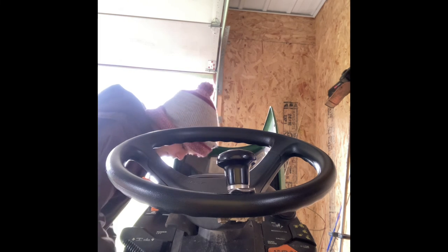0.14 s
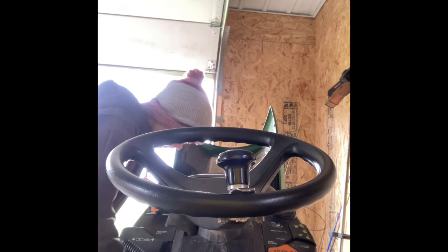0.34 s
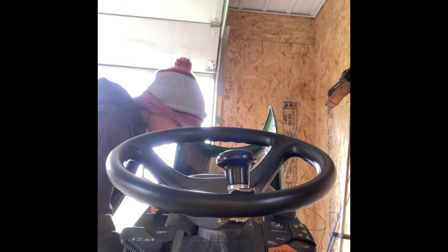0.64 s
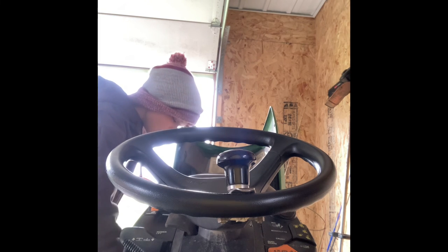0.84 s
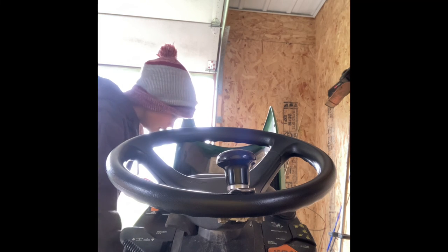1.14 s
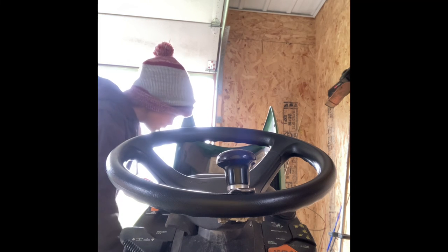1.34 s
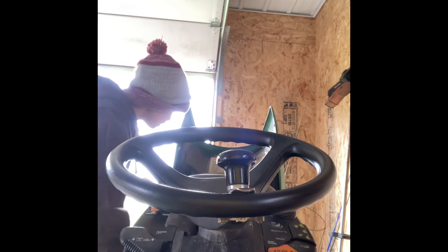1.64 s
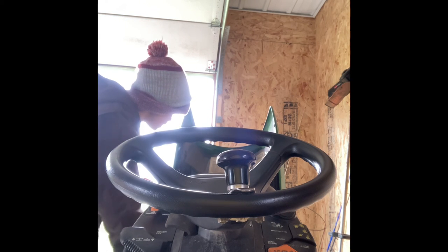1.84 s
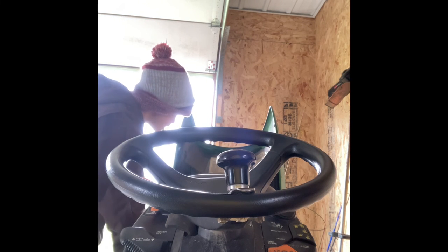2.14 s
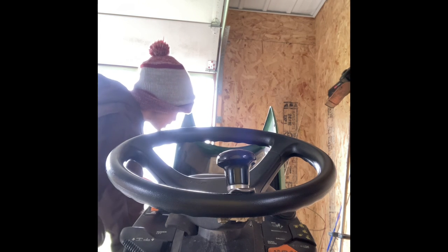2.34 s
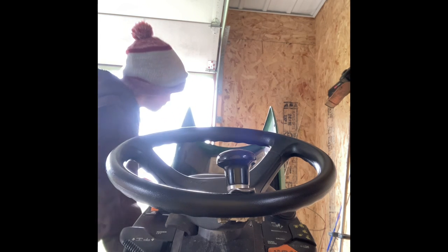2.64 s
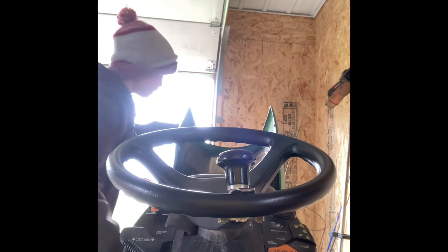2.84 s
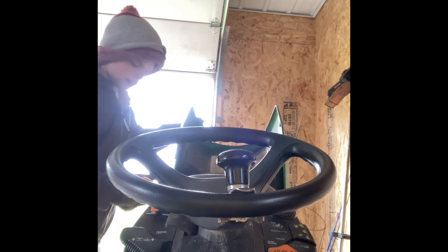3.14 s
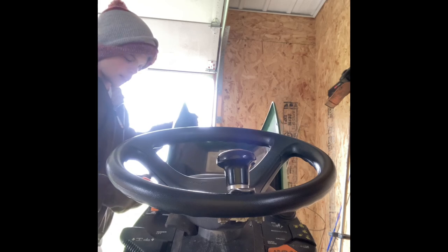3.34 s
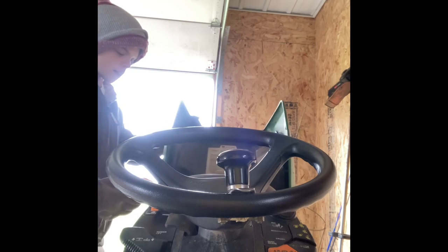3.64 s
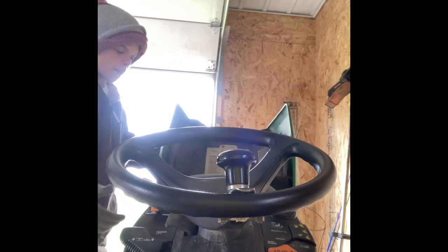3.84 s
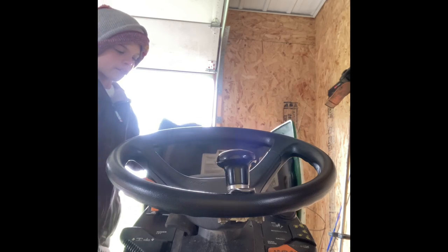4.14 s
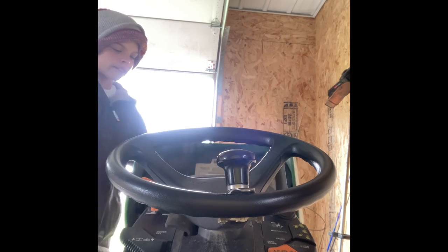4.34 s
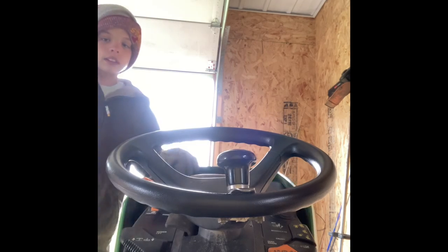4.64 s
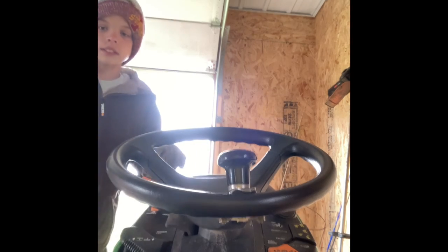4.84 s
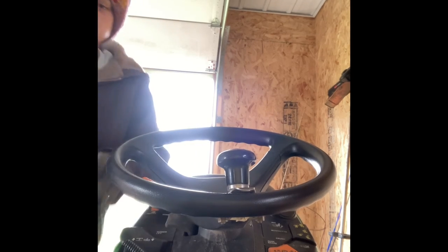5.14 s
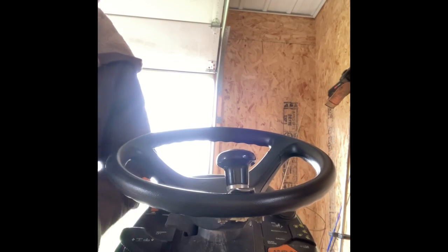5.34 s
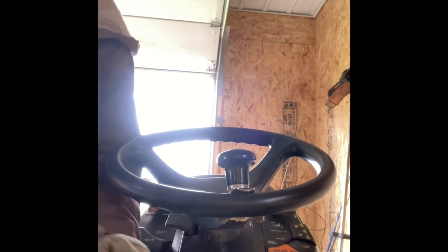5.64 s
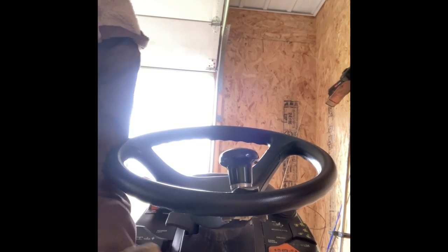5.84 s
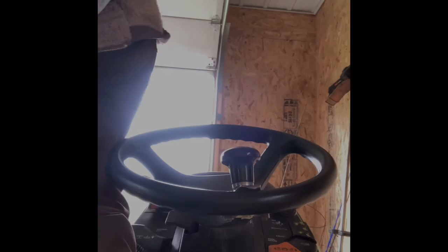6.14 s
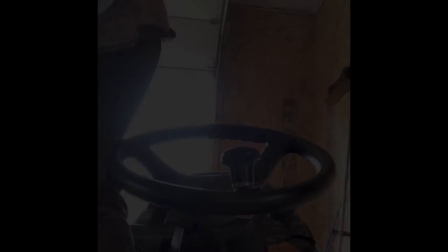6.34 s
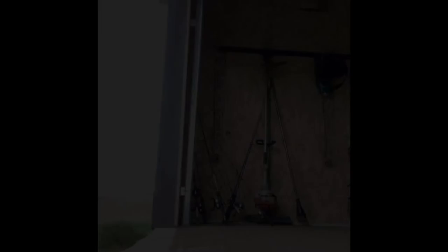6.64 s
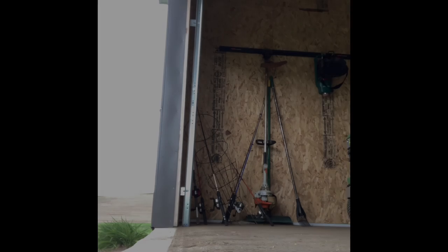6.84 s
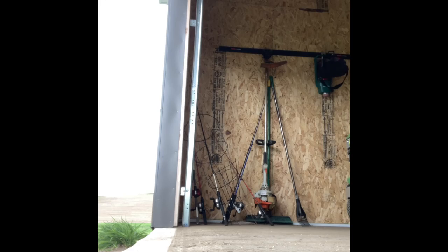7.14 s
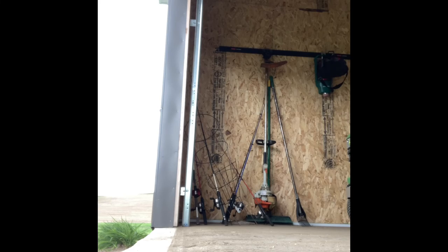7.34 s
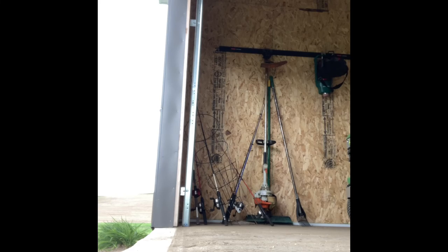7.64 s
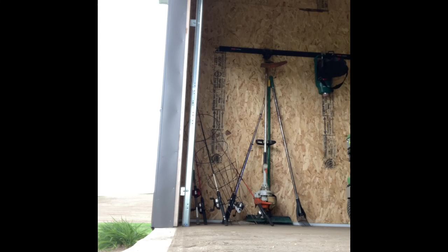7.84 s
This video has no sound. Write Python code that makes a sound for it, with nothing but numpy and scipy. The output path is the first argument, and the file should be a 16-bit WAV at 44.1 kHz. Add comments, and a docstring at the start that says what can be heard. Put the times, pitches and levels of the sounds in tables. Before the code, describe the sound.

Soft rustles and thin chirps, a loud rattling bang of a plastic hood closing, smaller knocks, then a clash and harsh pulsing starter cranking.

```python
"""In a wooden shed someone shuffles about a small tractor: bands of noise swell, and thin tones squeak.
Then its plastic hood swings shut: knocks ring its modes, crack, and rattle out band by band.
The level dips briefly. The starter engages with a clash, played as the last of the knocks, and cranks
the engine: random tooth clicks ring the gears over noise, tooth-rate tones and a low shake, surging at
each compression. A pair of close microphone ports listens."""
import sys
import numpy as np
from scipy import signal
from scipy.io import wavfile

SR = 44100
rng = np.random.default_rng(int(sys.argv[2]) if len(sys.argv) > 2 else 0)


def volts_from_db(level):
    """Convert decibel levels to linear amplitude ratios."""
    exponent = np.asarray(level, float) / 20
    return 10 ** exponent


def dump_mix(stems):
    """Bounce the given channels to the path in sys.argv[1] as a 16-bit WAV at rate SR."""
    frames = np.atleast_2d(stems).T  # one column per channel
    limited = np.clip(frames, -1, 1)  # hard clip at full scale
    pcm = np.round(limited * 32767).astype(np.int16)
    wavfile.write(sys.argv[1], SR, pcm)


N = 351918
STEP = 32   # samples between two points of an envelope
EDGES_HZ = 25 * 2 ** np.arange(0, 9.5, 1 / 3)   # third-octave bands
BAND_HZ = np.sqrt(EDGES_HZ[1:] * EDGES_HZ[:-1])   # their centres


def rms_one(x):
    """Scale a signal to unit power."""
    return x / np.sqrt(np.mean(x ** 2) + 1e-30)


def coarse_time():
    """Seconds on the thinned grid that envelopes use."""
    return np.arange(N // STEP + 2) * STEP / SR


def full(slow):
    """Read a thinned envelope at every sample."""
    return np.interp(np.arange(N) / STEP, np.arange(len(slow)), slow)


def in_time(rows, before=-150):
    """Join rows into curves on the thinned grid; before=None holds the first value back to zero time."""
    s, *columns = np.transpose(rows)
    return [np.interp(coarse_time(), s, c, left=before) for c in columns]


def at_hz(points, hz, outside=None):
    """Read a table of (Hz, value) on a log-frequency axis."""
    f, v = np.transpose(points)
    return np.interp(np.log(hz), np.log(f), v, left=outside, right=outside)


def drift(rate_hz):
    """Slow random wander of spread 1 on the thinned grid: noise through two equal smoothers."""
    r = np.exp(-2 * np.pi * rate_hz * STEP / SR)
    noise = rng.standard_normal(N // STEP + 2002)
    return rms_one(signal.lfilter([1], [1, -2 * r, r * r], noise)[2000:])


def swells(starts, holds, levels_db, rise_db_per_s, fall_db_per_s):
    """Sum the power of events that rise up to their start, hold and fall away."""
    age = coarse_time() - np.array(starts)[:, None]
    rise_db = rise_db_per_s * np.maximum(-age, 0)
    fall_db = fall_db_per_s * np.maximum(age - np.array(holds)[:, None], 0)
    return volts_from_db(2 * (np.array(levels_db)[:, None] - rise_db - fall_db)).sum(axis=0)


def resonate(x, hz, width_hz):
    """A resonance of gain 1 at its top."""
    r = np.exp(-np.pi * width_hz / SR)
    return signal.lfilter([(1 - r * r) / 2, 0, (r * r - 1) / 2],
                          [1, -2 * r * np.cos(2 * np.pi * hz / SR), r * r], x + 1e-18)


def band_shares(spectrum):
    """Share of a spectrum's power in each third-octave band."""
    power = volts_from_db(2 * at_hz(spectrum, BAND_HZ, outside=-87.5)) * np.diff(EDGES_HZ)
    return (power / power.sum())[:, None]


# How alike the two ports hear each pitch. Each row: pitch in Hz, likeness (1 is the same).
LIKENESS = [(40, .7), (80, .82), (150, .97), (430, .985), (600, .5), (1200, .15), (2200, .1), (5000, .55)]
# How the sound leans to one side. Each row: pitch in Hz, left over right in dB.
LEAN = [(60, .3), (240, -.8), (700, -1.5), (2000, -.5), (5000, 0)]


def spread(mid, side, hz):
    """Two unrelated signals become left and right, as alike as the ports hear this pitch."""
    alike = np.clip(at_hz(LIKENESS, hz), -.95, 1)
    lean = volts_from_db(at_hz(LEAN, hz) / 2 * np.array([[1], [-1]]))
    return lean * (np.sqrt(1 + alike) * mid + np.sqrt(1 - alike) * side * [[1], [-1]]) / np.sqrt(2)


def noise_bank(power, patchy_db):
    """Stereo noise that follows a power envelope per band, each band flickering a little."""
    white, out = rng.standard_normal((2, 2, N)), 0
    for k, (low, high) in enumerate(zip(EDGES_HZ, EDGES_HZ[1:])):
        band = signal.butter(2, [low, high], "band", fs=SR, output="sos")
        mid, side = signal.sosfilt(band, white[k % 2])
        gain = full(np.sqrt(power[k]) * volts_from_db(patchy_db * drift(13.3))) / np.std(mid)
        out = out + gain * spread(mid, side, BAND_HZ[k])
    return out


# Blows on hood and frame. Each row: time in seconds, strength in dB, then in dB relative to
# that strength: boom, crack, ring.
KNOCKS = [(0.166, -37.5, -35, -39, -6), (0.332, -50.5, -14, -31, 3.5), (0.593, -35, -22, -45, -8),
          (1.052, -37, -17, -37, -6), (1.649, -45.5, -11, -18, -17), (2.898, -37.5, 3.5, -19, -11),
          (2.946, -42, 19, -22, -14), (3.024, -11.5, -8, -19, -22), (3.049, -25, 5, -26, -10.5),
          (3.195, -35, 6, -27, -9), (3.273, -24, 0, -23, -33), (3.417, -34.5, -12, -13.5, -3.5),
          (3.75, -38.5, -4, -16, -7), (3.827, -23.5, -7.5, -20, -21.5), (3.924, -16, 2, -32, -15.5),
          (4.021, -36, 14, -25, -5), (4.16, -19.5, -7.5, -22, -6), (4.285, -8.5, -3.5, -4, -20.5),
          (4.32, -11.5, -5.5, -25.5, -0.5), (4.694, -11.5, -3, -21, -10.5), (4.769, -0.5, -11, -18.5, -7),
          (4.778, -2.5, 6, -5, -30), (5.216, -3.5, -15.5, -55.5, -9), (5.494, -9.5, -5.5, -16, -13),
          (5.526, -20, -3, -13, -2.5), (5.599, -33, -20, -15, -4), (5.728, -34, 8, -16.5, -8),
          (5.839, -29, 9, -12, -5.5), (5.873, -39.5, 13, -25, -8.5), (5.918, -27.5, -7.5, -8, -0.5),
          (6.431, -52, 13, 0, -8), (6.695, -42, 0, -10, -11), (6.817, -24, -3, -11, -8.5),
          (7.042, -7, -3, -1.5, -13)]
# Ringing modes of the hood. Each row: pitch in Hz, strength in dB, seconds to fall by 60 dB
# (each function that rings them sets a longest time).
HOOD = [(44.4, -37.5, 0.89), (71.6, -32, 0.7), (119.6, -28, 0.91), (180.6, -4.5, 0.61), (228.8, -8.5, 0.69),
        (300.3, -10, 0.56), (393.2, -7, 0.1), (459, -10.5, 0.56), (554.4, -13, 0.11), (676.3, -10.5, 0.087),
        (911, -10.5, 0.25), (1026, -9, 0.05), (1183, -8.5, 0.097), (1355, -10.5, .1), (1440, -25.5, 0.1),
        (1708, -13.5, 0.059), (1917, -13.5, 0.17), (2200, -12.5, 0.14), (2920, -23.5, 0.14),
        (3350, -3, 0.36), (3216, -16, 0.074), (4600, -23, .1)]


def hood(scatter_db=3.5):
    """Each blow strikes every mode with its own strength; the two ports hear it differently."""
    s, db, boom_db, crack_db, ring_db = np.transpose(KNOCKS)
    at, out = np.round(s * SR).astype(int), 0
    chance = rng.standard_normal((len(s), len(HOOD), 3))
    for k, (hz, mode_db, mode_t60) in enumerate(HOOD):
        # the boom weights the modes below 700 Hz, the crack those above 1500 Hz
        low_db = boom_db * np.clip(np.log2(700 / hz), 0, 1)
        high_db = (crack_db - 21.5) * np.clip(np.log2(hz / 1500), 0, 1)
        strike_db = db + ring_db + mode_db + low_db + high_db + scatter_db * chance[:, k, 0]
        clicks = np.zeros((2, N))
        clicks[:, at] = volts_from_db(strike_db) * np.sign(chance[:, k, 1:].T)
        # a yielding contact, no tick
        clicks = signal.sosfilt(signal.butter(2, 2.5 * hz, fs=SR, output="sos"), clicks + 1e-18)
        width_hz = np.log(1000) / (np.pi * min(mode_t60, .4))
        mid, side = resonate(clicks, hz, width_hz) * SR / (2 * np.pi * width_hz)
        out = out + spread(mid, side, hz)
    return out


# How long each pitch rattles after a blow. Each row: pitch in Hz, share of the 60 dB time.
DAMPING = [(60, 0.13), (250, 1.79), (1000, 0.78), (3000, 0.76), (8000, 0.49), (15000, 0.24)]


def knock_tails(tail_db=-15, t60_s=0.46, late_db=-22, late_t60_s=0.4):
    """Band powers after each blow: panels rattle out, each pitch at its own rate, and the shed rings on."""
    power, keeps = 0, at_hz(DAMPING, BAND_HZ)[:, None]
    for s, db, boom_db, crack_db, ring_db in KNOCKS:
        colour = [(50, boom_db - 54), (130, boom_db - 6), (220, boom_db), (400, boom_db), (900, -3),
                  (1700, -6.5), (2800, .5 * crack_db + 2), (5000, crack_db + 3), (15000, crack_db)]
        age = coarse_time() - s
        rise = np.clip(age / (0.0022 + 2.74 / BAND_HZ[:, None]), 0, 1) ** 2   # lows bloom later
        age = np.maximum(age, 0)
        panels = volts_from_db(-120 * age / (t60_s * keeps))
        shed = volts_from_db(2 * late_db - 120 * age / (late_t60_s * keeps))
        level_db = db + tail_db + at_hz(colour, BAND_HZ)[:, None]
        power = power + volts_from_db(2 * level_db) * rise * (panels + shed)
    return power


def bright_burst(strikes, die_s, low_hz, high_hz):
    """Stereo grit that dies away after each strike, kept between two pitches."""
    grit = spread(*rng.standard_normal((2, N)), 5000)
    burst = signal.lfilter([1], [1, -np.exp(-1 / (die_s * SR))], strikes + 1e-18) * grit
    return signal.sosfilt(signal.butter(4, [low_hz, high_hz], "band", fs=SR, output="sos"), burst)


def cracks(push_hz=900, push_db=28):
    """The first instants of each blow: a bright noise burst and a blunt, resonant push."""
    s, db, boom_db, crack_db, ring_db = np.transpose(KNOCKS)
    at, strikes, pushes = np.round(s * SR).astype(int), *np.zeros((2, N))
    strikes[at] = volts_from_db(db + crack_db - 6)
    pushes[at] = -volts_from_db(db + ring_db + push_db)
    # plastic gives a soft contact
    pushes = signal.sosfilt(signal.butter(4, 2000, fs=SR, output="sos"), pushes + 1e-18)
    push = resonate(resonate(pushes, push_hz, 1000), push_hz, 1000)
    return bright_burst(strikes, 0.0043, 1100, 9000) + push


# A dry, thin snap. Each row: time in seconds, strength in dB before a fixed boost.
SNAP = [(6.4012, -23.5)]


def snap():
    """One very short burst of noise, without ring."""
    strike = np.zeros(N)
    strike[round(SNAP[0][0] * SR)] = volts_from_db(SNAP[0][1] + 6)
    return bright_burst(strike, 0.0017, 1100, 5800)


# Loose latch parts chatter. Each row: start in seconds, level in dB, die-away in seconds.
RATTLES = [(4.29, -45, 0.051), (4.79, -38, 0.11), (5.499, -32, 0.07), (5.918, -36, 0.01)]


def rattle(uneven_db=4, clicks_per_s=210, above_hz=1700, longest_t60_s=.035, follows=.3):
    """Dying runs of small clicks into the upper modes of the hood, whose dB count only in part."""
    t = np.arange(N) / SR
    envelope = sum(volts_from_db(db) * np.exp(-np.maximum(t - s, 0) / die_s) * (t > s) for s, db, die_s in RATTLES)
    sizes = volts_from_db(uneven_db * np.minimum(rng.exponential(1, (2, N)), 4)) * rng.choice([-1, 1], (2, N))
    clicks, out = envelope * sizes * (rng.random((2, N)) < clicks_per_s / SR), 0
    for hz, mode_db, mode_t60 in HOOD:
        if hz > above_hz:
            width_hz = np.log(1000) / (np.pi * min(mode_t60, longest_t60_s))
            ring = spread(*resonate(clicks, hz, width_hz), hz) * SR / (2 * np.pi * width_hz)
            out = out + volts_from_db(follows * mode_db) * ring
    return out


def through_hood(noise, ring_db=4):
    """Whatever noise shakes the tractor also feeds the modes of hood and frame."""
    rings = 0
    for hz, mode_db, mode_t60 in HOOD:
        width_hz = np.log(1000) / (np.pi * min(mode_t60, .5))
        rings = rings + volts_from_db(ring_db + 0.79 * mode_db) * resonate(noise, hz, width_hz)
    return volts_from_db(-4) * (noise + rings)


# The piston comes up on compression and the gears bite harder.
# Each row: time in seconds, surge of the grind in dB, half width in seconds (to 1/e of the surge).
COMPRESSIONS = [(7.264, 6, 0.033), (7.367, 9.5, 0.013), (7.49, 6, 0.02), (7.586, 7, 0.029),
                (7.721, 6, 0.039), (7.838, 7, .025), (7.97, 5.5, 0.038)]


def surges_db():
    """Swells of load, one smooth hump per compression."""
    return sum(db * np.exp(-((coarse_time() - s) / width) ** 2) for s, db, width in COMPRESSIONS)


# The starter over time, before each part's own trim.
# Each row: time in seconds, gear grind in dB, engine thump in dB, growl in dB.
CRANK = [(7.02, -46.5, -63, -42), (7.044, -14.5, -37, -15), (7.094, -23.5, -16.5, -12.5),
         (7.196, -20.5, -38, -14.5), (7.228, -24, -19.5, -18.5), (7.33, -17.5, -25, -17.5),
         (7.396, -23.5, -31, -22), (7.512, -24, -30.5, -21.5), (7.98, -25, -35, -27)]
# Resonances of the gears. Each row: pitch in Hz, width in Hz, strength in dB relative to the others.
GEARS = [(1117, 170, -12.5), (1740, 160, -13), (1970, 12, -4), (2800, 22, 0.5), (3070, 89, -2.5),
         (4260, 65, -13.5), (4817, 140, -3.5), (5220, 33, -1.5), (6330, 86, -17.5), (6370, 75, -17),
         (6980, 67, -13), (8500, 150, -6.5), (8980, 230, -6.5), (10400, 160, -25), (11300, 80, -16),
         (12200, 300, -21)]
# The housing sings. Each row: full from in seconds, hold in seconds, level in dB before a trim.
HUMS = [(7.088, 0.023, -16.5), (7.237, .06, -33), (7.498, 0.18, -28.5), (7.75, 0.15, -20.5)]


def starter_gears(chatter_per_s=900, uneven_db=1.0, waver_db=1.5, housing_hz=684, housing_width_hz=45):
    """Uneven tooth chatter rings pinion, ring gear and housing."""
    sizes = volts_from_db(uneven_db * np.minimum(rng.exponential(1, (2, N)), 5)) * rng.choice([-1, 1], (2, N))
    chatter = sizes * (rng.random((2, N)) < chatter_per_s / SR)
    rings = 0
    for hz, width_hz, db in GEARS:
        mid, side = resonate(chatter, hz, width_hz)
        rings = rings + volts_from_db(db) * full(volts_from_db(waver_db * drift(2.9))) * spread(mid, side, hz)
    grind = full(volts_from_db(in_time(CRANK)[0] - 5 + surges_db())) * rms_one(rings)
    hum = resonate(resonate(chatter, housing_hz, housing_width_hz), housing_hz, housing_width_hz)
    sings = np.sqrt(swells(*np.transpose(HUMS), rise_db_per_s=600, fall_db_per_s=206))
    return grind + full(sings * volts_from_db(1.5 * drift(11) - 3.5)) * spread(*rms_one(hum), housing_hz)


# Colours of brush hiss, growl and engine thump. Each row: pitch in Hz, relative dB per Hz.
GRIND = [(1060, -33), (1800, 0.5), (2410, -18.5), (3200, 5), (3540, -7.5), (4790, -1), (7560, -11),
         (9000, -7), (14600, -22), (16000, -30)]
GROWL = [(150, -40), (250, -41), (392, -4), (581, -10.5), (693, -1), (1380, -6), (1770, -3.5), (2600, -32),
         (3380, -56), (5720, -120)]
THUMP = [(15, -32), (25, -18), (48, -13), (103, -9.5), (179, -3), (296, -5), (380, -14), (490, -36),
         (840, -120)]


def starter_noise():
    """Band powers of brush hiss, growl and the thumping engine."""
    grind_db, thump_db, growl_db = in_time(CRANK)
    grind = volts_from_db(2 * (grind_db - 2 + surges_db())) * band_shares(GRIND)
    growl = volts_from_db(2 * (growl_db - 1 + 0.53 * surges_db())) * band_shares(GROWL)
    return grind + growl + volts_from_db(2 * thump_db) * band_shares(THUMP)


# Pinion teeth on the ring gear. Each row: time in seconds, mean teeth per second.
MESH = [(7.24, 828), (7.37, 815), (7.42, 840), (7.58, 822), (7.72, 788), (7.88, 772), (7.98, 772)]
# Tones of the tooth rate. Each row: multiple of the rate, level in dB at speed, level in dB once
# bogged down; surges and flutter come on top.
MESH_TONES = [(2, -45, -32), (3, -47, -37.5), (4, -37.5, -42.5), (5, -43, -35.5), (6, -31.5, -33)]


def gear_tones(slop=.015, flutter_db=3, bite=.3, late=3):
    """Multiples of the tooth rate, moving to their bogged-down levels as the motor labours."""
    per_s = full(in_time(MESH, before=None)[0] * (1 + slop * drift(110)))
    turn, out = 2 * np.pi * np.cumsum(per_s) / SR, 0
    along = (coarse_time() - MESH[0][0]) / (MESH[-1][0] - MESH[0][0])
    for order, fast_db, slow_db in MESH_TONES:
        db = fast_db + (slow_db - fast_db) * along.clip(0, 1) ** late
        db = db + bite * surges_db() + flutter_db * drift(35)
        tone = np.sin([round(order) * turn, round(order) * turn + .5])
        out = out + full(np.sqrt(2) * volts_from_db(db) * (along > 0)) * tone
    return out


# Motor whine. Each row: time in seconds, pitch in Hz, level in dB.
SPIN_UP = [(7.05, 190, -26), (7.1, 216.8, -43), (7.14, 372, -22), (7.2, 403, -22), (7.26, 407, -46)]


def spin_up_whine():
    """The motor's rising whine and its octave, faded out at the end."""
    hz, whine_db = (full(c) for c in in_time(SPIN_UP + [(7.35, 420, -90)], before=None))
    turn = 2 * np.pi * np.cumsum(hz) / SR
    started = np.arange(N) / SR > SPIN_UP[0][0]
    return volts_from_db(whine_db) * started * (np.sin(turn) + 0.77 * np.sin(2 * turn))


def rotor_shake(rotor_hz=45.3, waver=0.0312):
    """The armature shakes the frame at its rate and multiples, once it is up to speed."""
    turn = 2 * np.pi * np.cumsum(rotor_hz * (1 + waver * full(drift(3.8)))) / SR
    levels_db = [-4.5, -16, -16, -17.5]   # relative to the thump
    shake = sum(volts_from_db(db) * np.sin((k + 1) * turn) for k, db in enumerate(levels_db))
    return full(volts_from_db(in_time(CRANK)[1]) * np.clip((coarse_time() - 7.19) / .03, 0, 1)) * shake


# Colours of panel rumble, scuffing, cloth rustle and frame thud. Each row: pitch in Hz, relative dB per Hz.
RUMBLE = [(65, -32.5), (110, -35), (220, -4), (445, -2.5), (485, -3.5), (934, -11.5), (1100, -13),
          (1430, -47), (2420, -120)]
SCUFF = [(410, 1), (700, -0.5), (770, -12.5), (957, -1), (1610, -3), (1870, -3), (2670, -5), (3270, -11.5),
         (3530, -12.5), (4540, -12), (5600, -21), (7280, -53), (12300, -120)]
RUSTLE = [(2060, -27), (3500, -4), (5710, -7), (6610, -7), (12000, -13), (16000, -16)]
THUD = [(15, -41), (25, -38), (49, 3.5), (92, -5.5), (140, -1), (180, -23), (310, -120)]
# Shuffles, rubs and shudders, before the hood's response. Each row: full from in seconds,
# hold in seconds, panel rumble in dB, scuffing in dB, cloth rustle in dB.
MOVES = [(0.0, 0.042, -54.5, -45, -52.5), (0.188, 0.069, -56.5, -57.5, -63), (0.354, 0.098, -71, -50, -58),
         (0.584, 0.086, -52.5, -56, -61.5), (0.792, 0.064, -59, -46, -52.5),
         (0.905, 0.068, -57.5, -59, -80), (1.045, 0.093, -56.5, -57, -63.5), (1.292, 0.048, -61, -52, -64),
         (1.656, 0.12, -60, -61.5, -68), (1.838, 0.016, -57, -60.5, -68), (1.903, 0.13, -59.5, -59, -67.5),
         (2.206, 0.041, -61, -69, -83), (2.61, 0.3, -56.5, -59.5, -64.5), (2.912, .1, -44, -49.5, -53),
         (3.067, 0.063, -50, -42.5, -57), (3.205, 0.037, -30.5, -46, -58), (3.395, 0.27, -50, -52, -57),
         (3.65, 0.34, -56, -57, -58.5), (3.934, 0.073, -32.5, -50, -42), (4.127, 0.2, -34.5, -48, -47.5),
         (4.312, 0.13, -21, -32, -35.5), (4.52, 0.17, -30, -41, -39), (4.819, 0.086, -16, -21, -33),
         (4.965, 0.25, -26.5, -33.5, -79), (5.287, 0.071, -37, -42.5, -58.5),
         (5.41, 0.099, -57, -43.5, -44.5), (5.556, 0.076, -43, -30.5, -47), (5.715, .1, -42, -43.5, -46),
         (5.844, 0.17, -64, -43.5, -44), (6.045, 0.094, -63, -47, -49.5), (6.2, 0.093, -65, -52, -57.5),
         (6.435, 0.073, -70, -53, -58), (6.606, 0.1, -60.5, -74, -77), (6.839, 0.017, -39, -42.5, -45),
         (6.908, 0.092, -56, -50, -58)]
# Between movements, likewise. Each row: time in seconds, panel rumble in dB, frame thud in dB.
STIR = [(0, -69, -62.5), (1.5, -66, -70), (2.4, -64.5, -67), (2.88, -57, -71), (2.96, -53, -40),
        (3.2, -55, -37.5), (3.85, -49, -57), (4.05, -45, -36), (4.5, -41, -36.5), (4.7, -45, -47),
        (4.85, -42, -30), (5.0, -50, -37), (5.4, -42, -40), (5.95, -57, -33.5), (6.3, -51.5, -56.5),
        (6.47, -66.5, -44), (6.56, -77, -75), (6.62, -69.5, -61), (7.0, -65, -55), (7.1, -77, -70)]


def moving_about():
    """Band powers of panels, scuffs and cloth, swelling per movement, over a lumpy frame thud."""
    s, hold, *levels = np.transpose(MOVES)
    stir_db, thud_db = in_time(STIR, before=None)
    power = volts_from_db(2 * (thud_db + 3.5 * drift(4.4))) * band_shares(THUD)
    # colour, dB of its steady stir relative to the rumble, rise and fall in dB per second
    kinds = ((RUMBLE, 0, 301, 149), (SCUFF, -2.5, 314.5, 137), (RUSTLE, -8.5, 405, 191.5))
    for level_db, (colour, under_db, rise, fall) in zip(levels, kinds):
        moves = swells(s, hold, level_db, rise, fall)
        power = power + (moves + volts_from_db(2 * (stir_db + under_db))) * band_shares(colour)
    return power


# Faint squeaks. Each row: start in seconds, length in seconds, starting pitch in Hz, level in dB.
SQUEAKS = [(.69, .05, 2500, -68), (1.44, .08, 2450, -72), (1.7, .2, 4720, -77), (1.8, .32, 4440, -74),
           (1.82, .11, 2400, -68), (1.95, .12, 2350, -69), (2.33, .17, 2790, -74), (3.39, .06, 3300, -61),
           (3.56, .1, 1950, -63)]
# Far chirps. Each row: start in seconds, start pitch in Hz, end pitch in Hz, level in dB.
CHIRPS = [(2.35, 4000, 3400, -75), (2.47, 3600, 4100, -75), (2.56, 3700, 4400, -72),
          (2.84, 4300, 3700, -67), (2.96, 3600, 4100, -65), (3.31, 4300, 3800, -62),
          (3.46, 3700, 4600, -65), (3.54, 3700, 4500, -65)]


def squeaks(waver=.02, flutter_db=5, sag_hz_per_s=300, chirp_s=.04):
    """Thin, unsteady gliding tones; squeaks sag in pitch, chirps go either way."""
    t, out = np.arange(N) / SR, np.zeros((2, N))
    wobble, flutter = 1 + waver * full(drift(90)), full(volts_from_db(flutter_db * drift(60)))
    glides = [(s, s + d, hz, hz - sag_hz_per_s * d, db) for s, d, hz, db in SQUEAKS]
    glides += [(s, s + chirp_s, *rest) for s, *rest in CHIRPS]
    for start, end, from_hz, to_hz, db in glides:
        span = slice(round(start * SR), round(end * SR))
        along = (t[span] - start) / (end - start)
        turn = 2 * np.pi * np.cumsum((from_hz + (to_hz - from_hz) * along) * wobble[span]) / SR
        swell = np.sqrt(np.sin(np.pi * along).clip(0))
        out[:, span] += volts_from_db(db) * swell * flutter[span] * np.sin([turn, turn - np.pi / 2])
    return out


DIP_S = 6.56   # when the level dips briefly


def hiss(level_db=-102):
    """Microphone hiss, equal power in every band, up to the dip; level before the hood's response."""
    return volts_from_db(2 * level_db) * (coarse_time() < DIP_S)


def scene():
    """Noise powers add band by band; rings, cracks and tones lie on top."""
    noise = noise_bank(moving_about() + knock_tails() + starter_noise() + hiss(), patchy_db=2.0)
    blows = hood() + rattle() + cracks() + snap()
    starter = starter_gears() + gear_tones() + spin_up_whine() + rotor_shake()
    return through_hood(noise) + blows + squeaks() + starter


def top_cut(x):
    """Nothing passes above the cut-off."""
    return signal.sosfilt(signal.butter(12, 16340, fs=SR, output="sos"), x)


def record(dry):
    """Deep bass is cut, the left port lags, peaks round off, the level dips, treble folds to the centre."""
    left, right = signal.sosfilt(signal.butter(4, 36, "high", fs=SR, output="sos"), dry)
    before, after = (np.pad(left, (lag, 0))[:N] for lag in (4, 1))   # lag in samples around the dip
    left = np.where(np.arange(N) < DIP_S * SR, before, after)
    dip = np.clip(np.abs(np.arange(N) / SR - DIP_S) / 0.026, .1, 1)
    left, right = dip * np.tanh(left), dip * np.tanh(right)
    side = signal.sosfiltfilt(signal.butter(8, 5800, fs=SR, output="sos"), left - right) / 2
    side = side + volts_from_db(-30.5) * (left - right)   # a trace of width stays at every pitch
    mix = (left + right) / 2 + side * [[1], [-1]]
    return top_cut(mix)


dry = scene()
out = record(dry)
dump_mix(out)
```